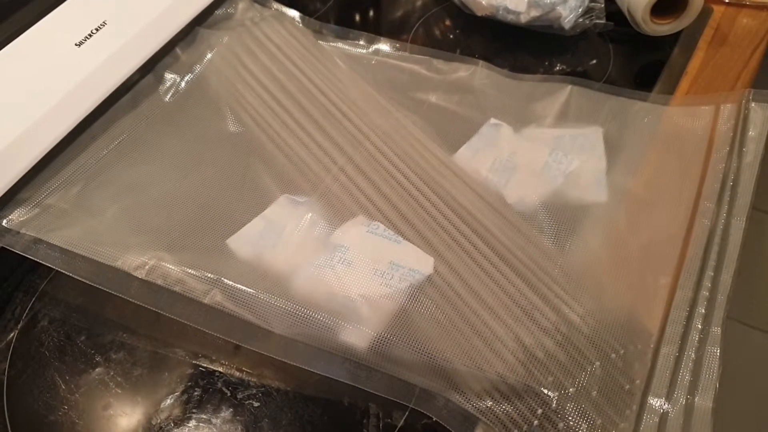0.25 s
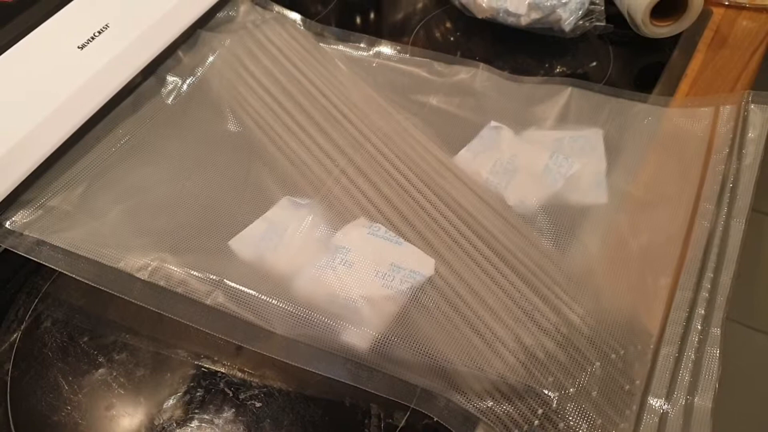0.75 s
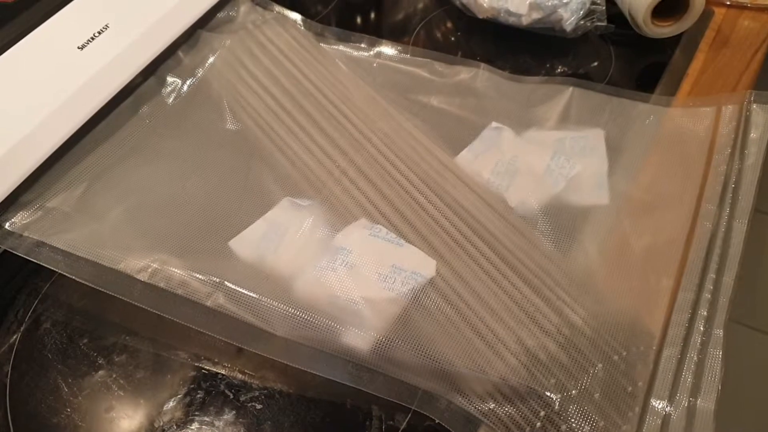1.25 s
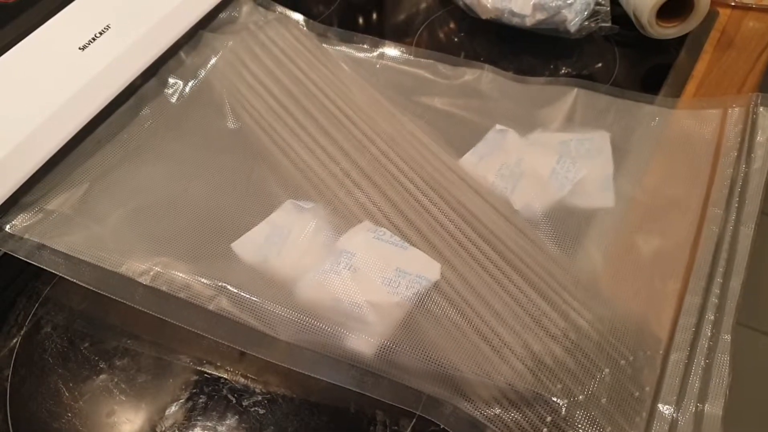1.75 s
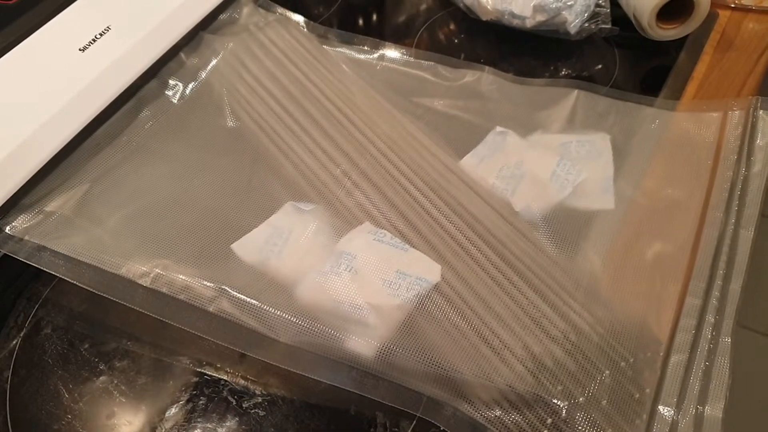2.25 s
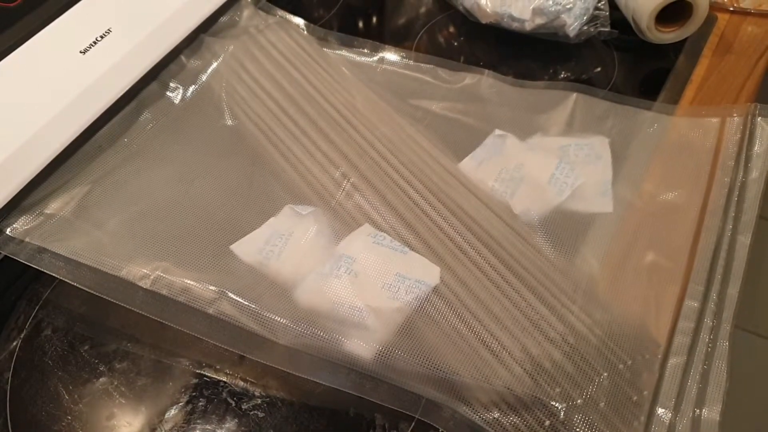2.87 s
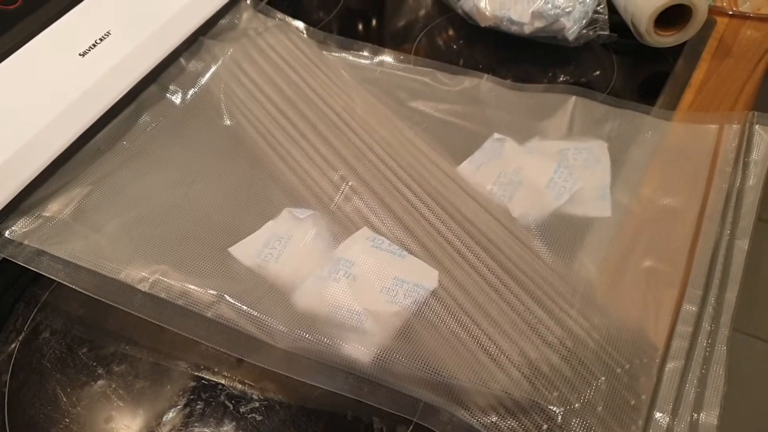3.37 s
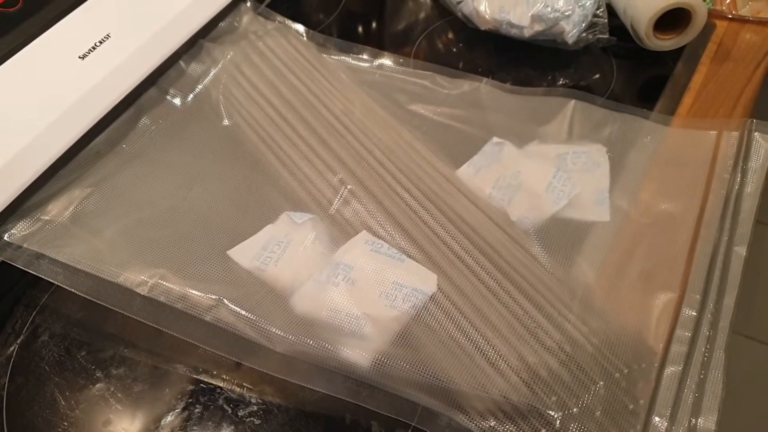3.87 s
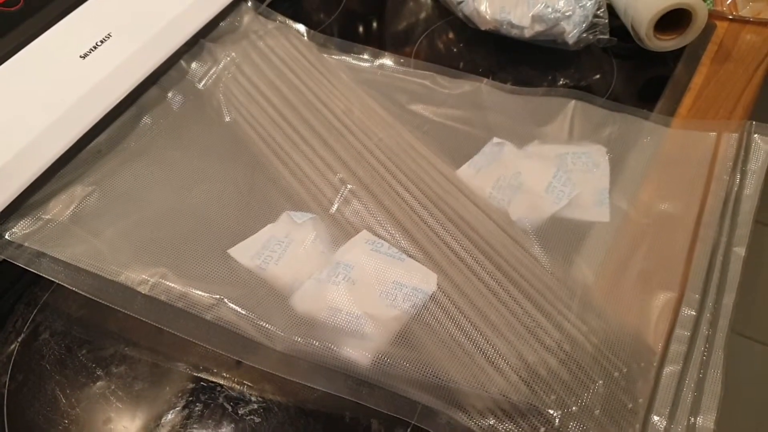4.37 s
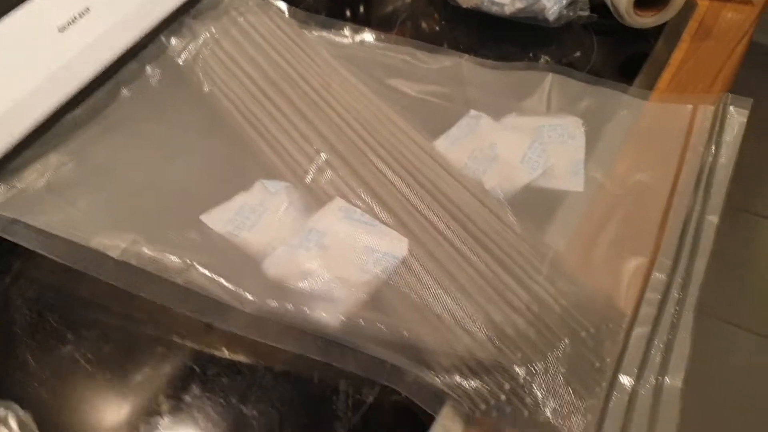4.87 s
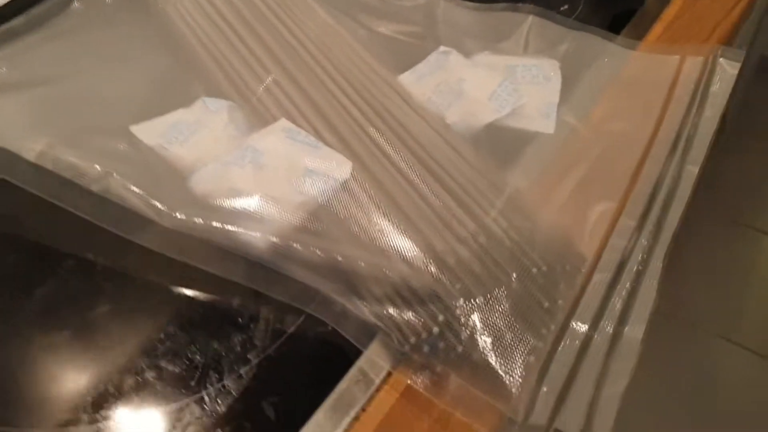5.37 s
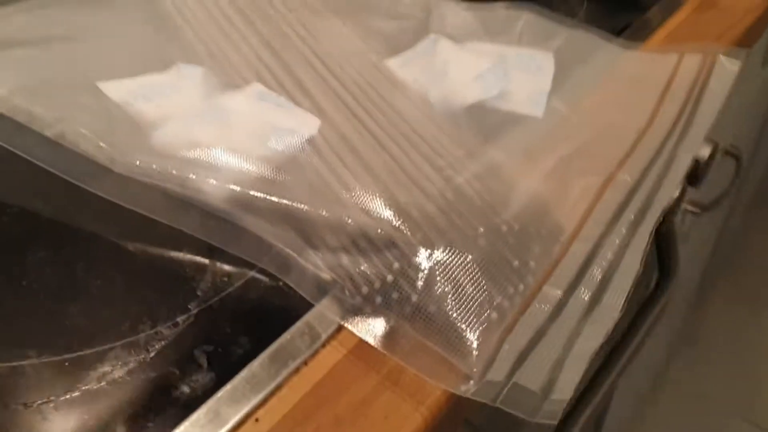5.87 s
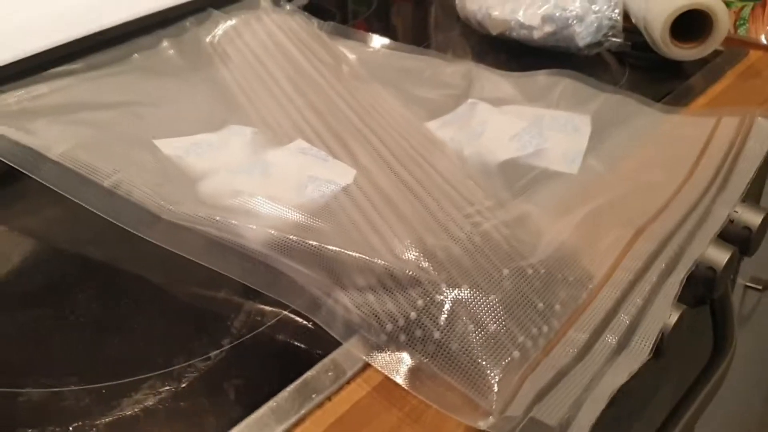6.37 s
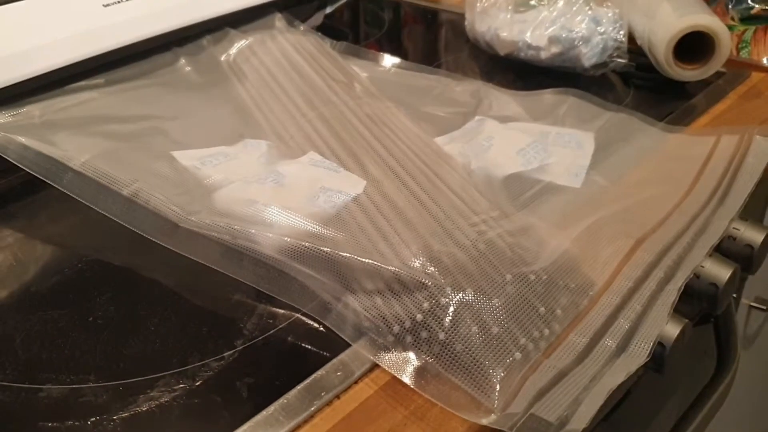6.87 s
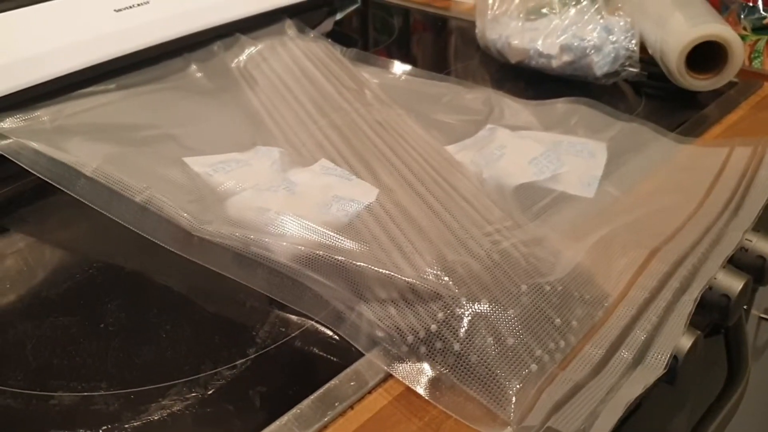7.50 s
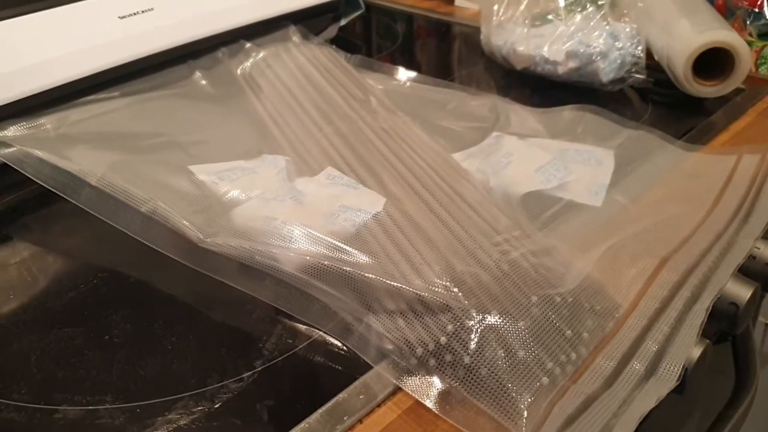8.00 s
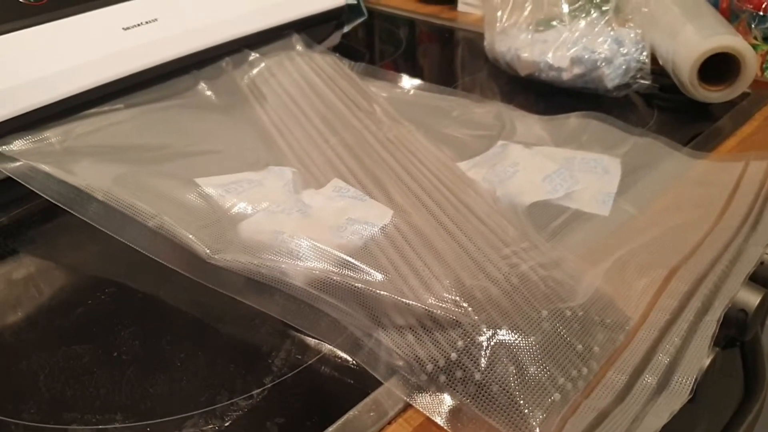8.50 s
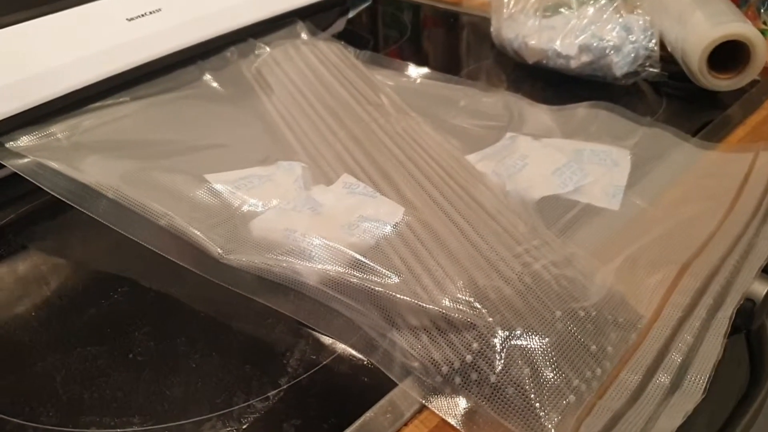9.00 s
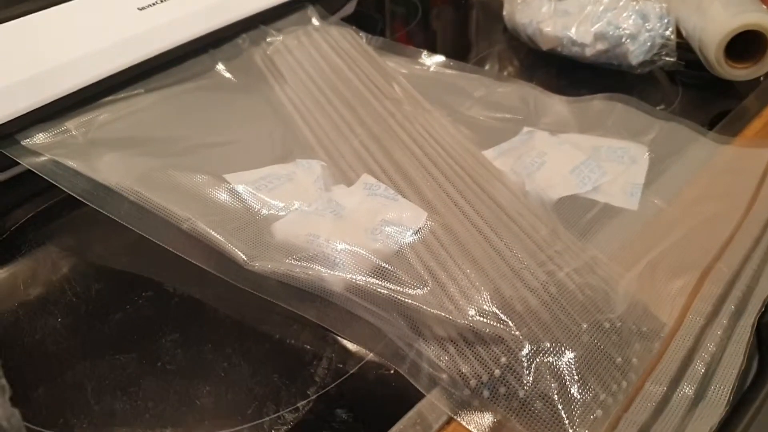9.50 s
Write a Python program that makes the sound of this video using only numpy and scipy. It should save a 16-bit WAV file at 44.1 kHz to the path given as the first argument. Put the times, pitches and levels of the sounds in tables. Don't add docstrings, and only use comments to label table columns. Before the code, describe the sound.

Indoors, heard from a nearby handheld stereo microphone, a vacuum sealer motor runs without stopping. Its steady buzz carries thin high whines and breathy valve air, with hardly any pitch drop. Plastic film ticks and creases softly at first, then pops occasionally as the bag tightens. Midway the microphone swings and the buzz changes colour. Late on, one bright snap breaks into a quick crackling cluster, and the motor keeps going.

```python
import sys
import numpy as np
from scipy import signal
from scipy.fft import irfft
from scipy.io import wavfile
from scipy.ndimage import uniform_filter1d

SR = 44100
rng = np.random.default_rng(int(sys.argv[2]) if len(sys.argv) > 2 else 0)


def output_pcm(signal):
    pcm = np.clip(np.atleast_2d(signal).T, -1, 1) * 32767
    wavfile.write(sys.argv[1], SR, np.round(pcm).astype(np.int16))


def to_linear_factor(level_db):
    exponent = np.asarray(level_db, float) / 20
    return 10 ** exponent


N = 429534
START_HZ = 72.2
ORDERS = 165


def read(points, hz):
    f, *values = np.transpose(points)
    return np.array([np.interp(np.log(hz + 1), np.log(f + 1), v) for v in values])


def wander(hz):
    low_pass = signal.butter(2, hz, fs=SR / 64, output="sos")
    x = signal.sosfilt(low_pass, rng.standard_normal(N // 64 + 500))[498:]
    return np.interp(np.arange(N) / 64, np.arange(len(x)), x / x.std())


def band(x, lo_hz, hi_hz):
    return signal.sosfilt(signal.butter(2, [lo_hz, hi_hz], "band", fs=SR, output="sos"), x)


def ramp(start_s, length_s):
    return np.sin(np.pi / 2 * np.clip((np.arange(N) / SR - start_s) / length_s, 0, 1)) ** 2


def kitchen(x):
    t = np.arange(SR // 3) / SR
    tail = rng.standard_normal((2, len(t))) * to_linear_factor(-60 * t / 0.19) * (t > .003)
    return signal.fftconvolve(x, tail / np.linalg.norm(tail[0]), axes=1)[:, :N]


# start_s, length_s, level_db, low_hz, high_hz
RUSTLES = [
    (0.736, .12, -46, 2300, 5600),
    (2.15, .1, -50, 1500, 4500),
]


def film_rustles():
    out, now = np.zeros((2, N)), np.arange(N) / SR
    for start_s, length_s, level_db, lo_hz, hi_hz in RUSTLES:
        ticks = rng.standard_normal((2, N)) * (rng.random(N) < 1500 / SR) * 15
        half_s = length_s / 2
        swell = np.exp(-((now - start_s - half_s) / half_s) ** 2)
        out += band(ticks, lo_hz, hi_hz) * to_linear_factor(level_db) * swell
    return out


# start_s, peak_db, centre_hz, width_octaves, left_minus_right_db
SNAPS = [(.547, -33, 1800, .6, 0), (2.136, -26, 1700, 0.75, -8), (2.926, -33, 5000, 2, 5),
         (3.404, -31, 1400, .8, -1), (3.689, -25.5, 3420, 0.46, 2), (4.277, -24, 1100, 1.2, -2),
         (4.802, -28, 1700, 1.1, -4), (5.062, -30, 1300, 1.2, 2), (5.960, -34, 1800, 0.55, 2),
         (6.877, -26, 5800, .5, 10), (8.979, -14, 1450, 0.86, 3), (9.002, -31, 2500, 1.5, 0),
         (9.020, -21.5, 1200, 1.1, 6), (9.043, -28, 1300, .8, 0), (9.557, -26, 1700, 0.99, 4)]


def film_snaps():
    out, t = np.zeros((2, N)), np.arange(1200) / SR
    draws = rng.standard_normal((len(SNAPS), 3, len(t)))
    for (start_s, peak_db, hz, octaves, pan_db), draw in zip(SNAPS, draws):
        half = 2 ** (octaves / 2)
        click = 3.7 * (t == 0)
        burst = (draw[0] + .5 * draw[1:] + click) * to_linear_factor(-60 * t / 0.0063)
        burst = band(burst, hz / half, hz * half)
        burst /= abs(burst).max(axis=1, keepdims=True)
        crack = band((draw[0] + draw[1:]) * to_linear_factor(-60 * t / 0.0048), 3100, 7500)
        crack_db = 0.5 + .5 * (peak_db + 8)
        burst += to_linear_factor(crack_db) * crack / abs(crack).max()
        sides_db = peak_db + np.array([[.5], [-.5]]) * pan_db
        out[:, round(start_s * SR):][:, :len(t)] += burst * to_linear_factor(sides_db)
    return out


# pitch_hz, left_db_per_hz, right_db_per_hz, left_after_swing_db_per_hz, right_after_swing_db_per_hz
AIR = [(151, -74.5, -76, -77.5, -74.5), (600, -82, -83, -78.5, -82.5), (1400, -80, -80, -81, -84),
       (3000, -85.5, -88.5, -84, -88.5), (5700, -84.5, -95.5, -85.5, -95.5), (9070, -91, -92, -92, -95.5),
       (10430, -85.5, -97, -88, -96.5), (14900, -92, -92.5, -93, -93)]
# pitch_hz, likeness_0_to_1
HISS_SAME = [(60, 0.97), (300, .7), (700, 0.23), (2000, 0.039)]
# before_hz, after_hz, width_hz, level_db
SLIDES = [(0, 0, 45, -6), (1800, 1760, 230, 10), (5150, 6700, 180, 2.5), (5600, 5850, 150, 3),
          (8500, 8100, 270, -6.5), (11000, 10500, 450, 3), (13500, 13000, 350, -4), (14300, 14500, 340, -4)]


def air(turns, stage):
    frames, hz = N // 256 + 5, np.fft.rfftfreq(1024, 1 / SR)
    aside = np.clip(stage - 1, 0, 1)
    a, b, c, d = rng.standard_normal((4, frames, 513))
    same, left = np.clip(read(HISS_SAME, hz), 0, 1), a + 1j * b
    right = same * left + np.sqrt(1 - same ** 2) * (c + 1j * d)
    z = np.array([left, right])

    ripple_db = uniform_filter1d(rng.standard_normal((4, 513)), size=3) * 3.5 * np.clip(hz / 3000, 0, 1)
    level_db = read(AIR, hz) + ripple_db
    swing = aside[np.minimum(np.arange(frames) * 256, N - 1)][:, None]
    moved_db = (1 - swing) * level_db[:2, None] + swing * level_db[2:, None]
    patches_db = uniform_filter1d(rng.standard_normal(z.shape), size=10, axis=1)
    patches_db = uniform_filter1d(patches_db, size=8, axis=2)
    patches_db *= 2.1 / patches_db.std()
    slid_db = 0
    for before_hz, after_hz, width_hz, bump_db in SLIDES:
        centre_hz = before_hz + swing * (after_hz - before_hz)
        slid_db = slid_db + bump_db * np.exp(-((hz - centre_hz) / width_hz) ** 2)
    z *= to_linear_factor(moved_db + slid_db + patches_db) * (hz < 15560)
    z *= np.sqrt(SR / 1024 * 1.5)

    turn = turns % 1
    strength = to_linear_factor(1.3 * rng.standard_normal(800))[turns.astype(int) % 800]
    ring = 0.56 + 0.74 * strength * np.exp(-((turn - .02) % 1) / 0.47)
    puff = 0.83 + (.5 - 0.24 * aside) * (turn > .68)
    puff = puff + 0.68 * aside * np.exp(-((turn + 0.038) % 1) / 0.062)
    out = 0
    for lo_hz, hi_hz, gate in ((0, 1350, 0.9), (1350, 2500, ring), (2264, SR, puff)):
        part = (z * ((hz >= lo_hz) & (hz < hi_hz))).transpose(0, 2, 1)
        part = signal.istft(part, nperseg=1024, noverlap=768)[1]
        out = out + part[:, :N] * gate
    return out


# pitch_hz, before_swing_db, after_swing_db
WHINE = [(2350, 18, 17), (2600, 22, 19), (4200, 14, 12), (5150, 21, 16), (5850, 17, 21), (6900, 15, 17),
         (7900, 9, 9), (10600, 13, 13)]
# multiple, shared_db, difference_db, shared_after_swing_db, difference_after_swing_db
SHAFT = [(1, -34, -47.5, -34.5, -47.5), (2, -30.5, -49.2, -31.5, -52.5), (3, -35.5, -48, -41.5, -50),
         (4, -35, -59.9, -35.5, -64), (5, -46, -52, -49.5, -54.0), (6, -46.5, -62, -43, -73),
         (7, -49, -53, -46, -53), (8, -42.5, -52, -42, -55), (9, -37.5, -44.5, -33.5, -50),
         (10, -58.5, -56, -64.5, -51), (11, -49, -50, -49.5, -50.5), (12, -64.5, -64, -60, -70),
         (13, -50.5, -58.9, -56, -51), (14, -46, -61, -48.5, -52.5)]
# shared_loose_db, shared_tight_db, shared_after_swing_db, difference_before_db, difference_after_db
RING = [(-49.1, -52.5, -60, -48, -59), (-62, -51, -57.5, -53, -48), (-61, -64.5, -70, -56, -60),
        (-56.9, -54, -49, -64, -79), (-59.5, -56, -55.5, -43.5, -82), (-59.5, -58.5, -65, -46, -49),
        (-70.5, -67, -58, -56.5, -57.1), (-51, -48, -55.5, -60, -43), (-58, -48, -44, -36, -48.8),
        (-53, -47, -35.5, -37.5, -39.5), (-42.5, -38, -38, -57, -44), (-48, -53, -42.5, -48, -46),
        (-49.5, -61, -55, -42.5, -54), (-55.4, -52, -57.5, -46, -52.6), (-56.5, -49.5, -53.5, -53.6, -57),
        (-55.5, -53.5, -61, -59, -61), (-52.5, -51.5, -68, -49.5, -56)]
# pitch_hz, lead_radians
LEAN = [(72, -.3), (143, 1.2), (215, .45), (360, 2.3), (500, .8), (640, 2.6), (1000, .7), (1750, -1.3)]


def one_turn(stage, stroke, bends, size=4096):
    aside = stage // 2
    shaft_db, ring_db = np.transpose(SHAFT)[1:], np.transpose(RING)
    shared = to_linear_factor(np.r_[shaft_db[2 * aside], ring_db[stage]])
    k = np.arange(1, len(shared) + 1)
    differ = to_linear_factor(np.r_[shaft_db[2 * aside + 1], ring_db[3 + aside]])
    differ = differ * np.exp(1j * read(LEAN, k * START_HZ)[0])

    high = np.arange(len(k) + 1, ORDERS)
    hz = high * START_HZ
    hiss_db = read(AIR, hz)[2 * aside:2 * aside + 2]
    high_db = hiss_db + read(WHINE, hz)[aside] + 4.4 * rng.standard_normal((2, len(high)))
    scattered = to_linear_factor(high_db) * np.exp(1.2j * bends[:, len(k):])

    low = [shared + differ, shared - differ]
    lines = np.zeros((2, size // 2 + 1), complex)
    lines[:, 1:ORDERS] = np.c_[low, scattered] * np.exp(1j * stroke)
    return irfft(lines) * size / np.sqrt(2)


PLACES = ((.15, 2.8, -1.2, .8), (.15, 1.7, -0.82, 0.93), (.15, 0.6, 1.4, 0.39))


def hum(turns, stage):
    k = np.arange(1, ORDERS)
    out = np.zeros((2, N))
    ringing = -np.arctan((k - 24.3) / 1.3)
    paths = rng.standard_normal((3, len(k)))
    for n, (late, lean, slip, scatter) in enumerate(PLACES):
        push = np.where(k < 9, -.5 + .95 * np.cos(1.45 * (k - 2.6)), lean)
        delay = 2 * np.pi * late * (k - 24)
        strike = (slip + scatter * paths[0]) * (k < 32) + ringing - delay
        stroke = np.where(k < 15, push, strike)
        cycle = one_turn(n, stroke, paths[1:])
        at = np.arange(cycle.shape[1]) / cycle.shape[1]
        share = np.clip(1 - abs(stage - n), 0, 1)
        out += share * np.array([np.interp(turns % 1, at, c) for c in cycle])
    return out * to_linear_factor(0.25 * wander(25))


def scene():
    sag_hz_per_s, grip_drop_hz = .082, .13
    grip = ramp(2.76, .22)
    swing = ramp(4.56, 2)
    stage = grip + swing
    speed_hz = START_HZ - sag_hz_per_s * np.arange(N) / SR - grip_drop_hz * grip
    turns = np.cumsum(speed_hz + .018 * wander(10)) / SR + .00035 * wander(60)
    film = film_snaps() + film_rustles()
    return hum(turns, stage) + air(turns, stage) + film + to_linear_factor(-6) * kitchen(film)


def band_limit(x):
    return signal.sosfilt(signal.butter(12, 16300, fs=SR, output="sos"), x)


def record(dry):
    return band_limit(dry)


dry = scene()
out = record(dry)
output_pcm(out)
```